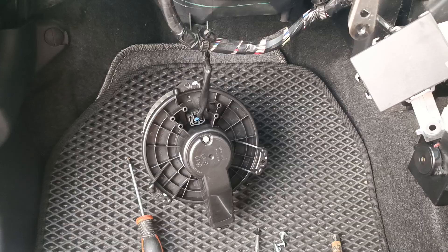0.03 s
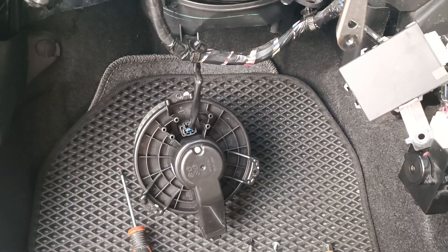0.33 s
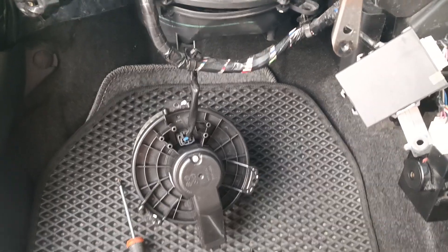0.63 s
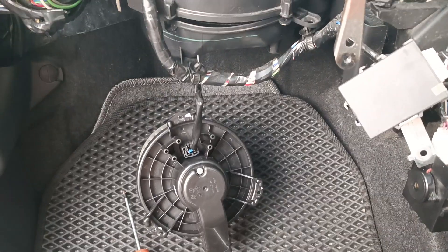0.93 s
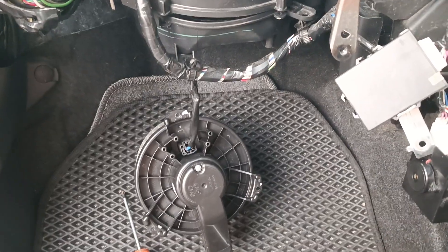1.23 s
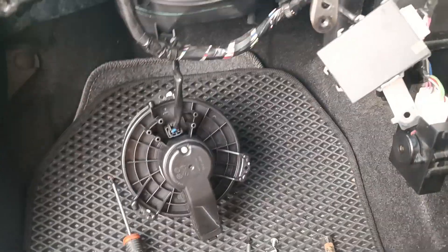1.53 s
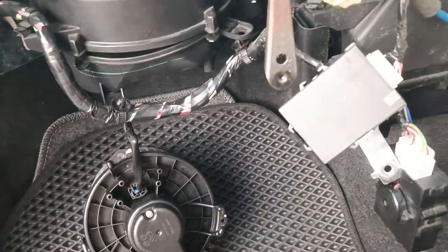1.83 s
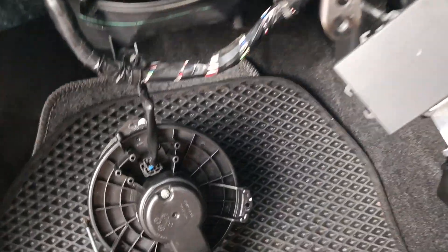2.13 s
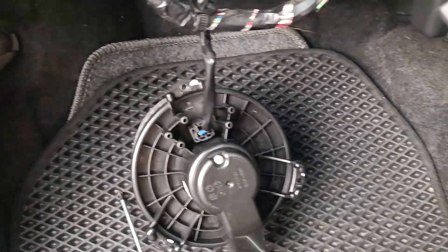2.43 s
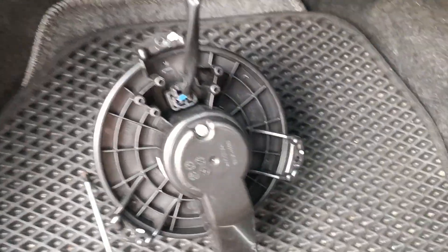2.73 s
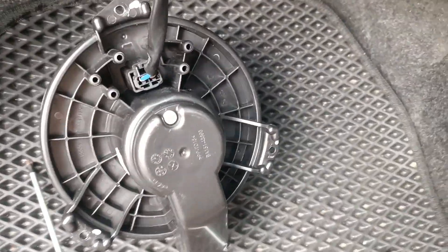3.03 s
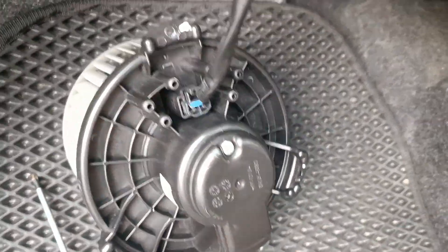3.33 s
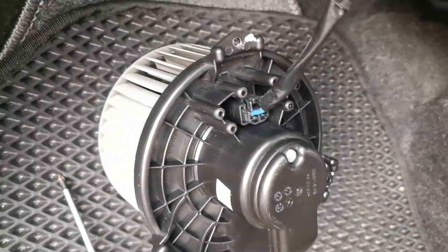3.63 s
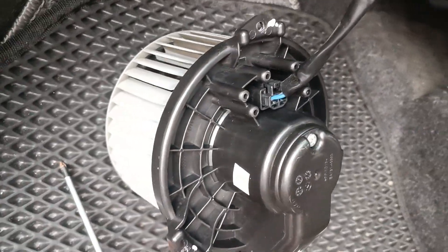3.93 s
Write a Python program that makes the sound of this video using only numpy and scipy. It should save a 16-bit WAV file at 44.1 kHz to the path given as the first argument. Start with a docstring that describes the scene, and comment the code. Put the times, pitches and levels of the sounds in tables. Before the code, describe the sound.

Dull handling knocks and a scrape on a blower motor, followed by a light, sharp clack.

```python
"""Handling noises in a car footwell

A hand-held camera moves over a blower motor lying in a low, steady rumble with a deep drone.
A sleeve brushes softly and a hand scrapes past the left microphone: friction, heard as many tiny slips.
The hand bumps the casing a few times, each damped impact exciting its modes. Then a small hard part
or tool clacks once on the right, ringing briefly at its own higher natural frequencies."""
import sys
import numpy as np
from scipy import signal
from scipy.fft import rfft, irfft
from scipy.io import wavfile
from scipy.ndimage import uniform_filter1d

SR = 44100
rng = np.random.default_rng(int(sys.argv[2]) if len(sys.argv) > 2 else 0)


def output_pcm(signal):
    """Save a mono or channel-first signal as 16-bit PCM at the path in sys.argv[1].

    Samples are clipped to [-1, 1] before scaling.
    """
    pcm = np.clip(np.atleast_2d(signal).T, -1, 1) * 32767
    wavfile.write(sys.argv[1], SR, np.round(pcm).astype(np.int16))


N = 176400
TIME = np.arange(N) / SR

def amp(db):
    """Amplitude ratio of a level in decibels."""
    return 10 ** (np.asarray(db) / 20)

def unit(x):
    """Normalisation to rms 1."""
    return x / np.sqrt(np.mean(x ** 2) + 1e-20)

def at_hz(points, hz):
    """Interpolation of each column on a log-frequency axis."""
    f, *columns = np.transpose(points)
    return np.array([np.interp(np.log(hz + 1), np.log(f + 1), column) for column in columns])

def at_time(points):
    """Linear interpolation over time."""
    return np.interp(TIME, *np.transpose(points))

def panned(side_db):
    """Level difference between channels: positive favours the left, and the louder gain is 1."""
    return amp(np.minimum([[side_db], [-side_db]], 0))

def add(mix, start, sound):
    """Superposition of a stereo sound from a start time in seconds."""
    part = mix[:, round(start * SR):][:, :sound.shape[1]]
    part += sound[:, :part.shape[1]]

def coloured(x, spectrum, tilt_db=0):
    """Spectral shaping to rms 1, with a tilt per octave about 4 kHz."""
    hz = np.fft.rfftfreq(x.shape[-1], 1 / SR)
    octaves = np.log2(np.maximum(hz, 500) / 4000)
    low_cut = hz ** 2 / (hz ** 2 + (spectrum[0][0] / 2) ** 2)
    return unit(irfft(rfft(x) * low_cut * amp(at_hz(spectrum, hz) + tilt_db * octaves), x.shape[-1]))

def drift(rate_hz):
    """Slow random modulation: low-passed noise of rms 1."""
    low_pass = np.exp(-(np.fft.rfftfreq(N, 1 / SR) / rate_hz) ** 2)
    return unit(irfft(rfft(rng.standard_normal(N)) * low_pass, N))

def tone(hz):
    """A sinusoid of rms 1 whose phase is the integral of frequency."""
    return np.sqrt(2) * np.sin(2 * np.pi * np.cumsum(hz) / SR)

def stroke(peak, rise, fall):
    """A Gaussian envelope with separate widths before and after its peak."""
    return np.exp(-.5 * ((TIME - peak) / np.where(TIME < peak, rise, fall)) ** 2)

def friction(per_s, spread_db, hiss):
    """Stick-slip friction: random impulses of uneven size over a smooth hiss, in stereo."""
    slips = (rng.random((2, N)) < per_s / SR) * rng.choice([-1, 1], (2, N))
    sizes = amp(spread_db * np.minimum(rng.exponential(1, (2, N)), 4))
    return unit(unit(slips * sizes) + hiss * rng.standard_normal((2, N)))

def ring(modes, t, scatter):
    """Free vibration: damped modes, with phases scattered by up to `scatter` cycles per channel."""
    return sum(amp(db - 60 * t / t60) * np.sin(2 * np.pi * (hz * t + scatter * rng.random((2, 1))))
               for hz, db, t60 in modes)

# Background spectrum (frequency [Hz], left density [dB/Hz], right density [dB/Hz])
CABIN_SPECTRUM = [(27, -82, -84), (40, -87, -91), (50, -72.5, -73), (76, -67, -68), (108.8, -71.5, -71.5),
                  (125, -77, -78.5), (154.4, -73.5, -75.5), (189.5, -84.5, -84.5), (253, -83.5, -87.5),
                  (290.7, -76, -77), (335, -86, -86), (450, -84, -85), (730, -88, -88.5),
                  (1370, -94.5, -93.5), (2280, -99, -88.5), (3300, -100, -96.5), (4050, -101.5, -104),
                  (5200, -102, -104), (6750, -107, -98), (7930, -113, -118), (8480, -112, -126),
                  (9810, -102, -120), (11600, -115, -114)]
# Likeness of the two channels (frequency [Hz], correlation [1])
CABIN_CORRELATION = [(60, 1), (150, 0.91), (380, 0.72), (950, -0.015), (2380, -0.032), (5980, 0.3),
                     (15000, 0.1)]
# Slow emphasis of the mids (time [s], gain [dB])
MID_GAIN = [(.2, 2), (.5, 3), (.8, 0.5), (1.3, 1), (1.9, 1), (2.2, 0), (3.65, -1), (4, 2.5)]
# Slow emphasis of the upper bass (time [s], gain [dB])
UPPER_BASS_GAIN = [(.3, 4), (1.2, -1), (3.6, 1), (3.85, 5)]
def cabin():
    """Partly correlated rumble and hiss, rippled by the cabin's many fixed resonances."""
    size, hop = 4096, 1024
    hz, t = np.fft.rfftfreq(size, 1 / SR), np.arange(N // hop + 3) * hop / SR
    a, b, c, d, patches = rng.standard_normal((len(t), len(hz), 5)).T
    correlation = at_hz(CABIN_CORRELATION, hz).T
    left = a + 1j * b
    right = correlation * left + np.sqrt(1 - correlation ** 2) * (c + 1j * d)
    ripple = unit(uniform_filter1d(rng.standard_normal((2, len(hz))), size=3, axis=1))
    colour_db = at_hz(CABIN_SPECTRUM, hz) + 1.67 * ripple / (1 + hz / 3000) * (hz > 330)
    patches = uniform_filter1d(patches, size=10, axis=0)
    flicker_db = 1.54 * unit(uniform_filter1d(patches, size=5, axis=1))
    level_db = colour_db[..., None] + flicker_db
    for curve, centre_hz, octaves in [(MID_GAIN, 694, 1.5), (UPPER_BASS_GAIN, 154, .6)]:
        band = np.exp(-(np.log2((hz + 1) / centre_hz) / octaves) ** 2)
        level_db += np.outer(band, np.interp(t, *np.transpose(curve)))
    noise = signal.istft(np.array([left, right]) * amp(level_db), nperseg=size, noverlap=size - hop)[1]
    return noise[:, :N] * np.sqrt(1.5 * SR / size)

# Deep tone (time [s], frequency [Hz], level [dB])
DEEP_TONE = [(.2, 54.7, -49.5), (.57, 47.4, -58), (1, 47.5, -56), (1.23, 54.3, -49.5), (1.89, 54.7, -45),
             (1.99, 48.4, -57.5), (2.21, 47.5, -49), (2.49, 48.1, -52.5), (2.63, 55, -61),
             (2.74, 55.85, -48.5), (4, 56, -50.5)]
# Hum above it (time [s], level [dB])
HUM_LEVEL = [(.3, -67), (.62, -46.5), (.9, -51), (1.6, -55), (2.13, -51), (2.45, -54)]
# Partials of a faint whine (frequency [Hz], level [dB], late swell [dB])
WHINE_PARTIALS = [(667, -78, 8.5), (889, -75.5, 1)]
def drone():
    """Modulated sinusoids: a deep tone that sags twice and recovers, a hum and a thin whine."""
    times, pitch, level = np.transpose(DEEP_TONE)
    deep = amp(np.interp(TIME, times, level)) * tone(np.interp(TIME, times, pitch))
    hum = amp(at_time(HUM_LEVEL)) * tone(hz=71 + 0.86 * drift(rate_hz=5.6))
    swell = stroke(peak=3.364, rise=0.28, fall=0.28)
    whine = sum(amp(db + swell_db * swell + 2 * drift(rate_hz=6.7)) * tone(hz + 2 * drift(rate_hz=9.3))
                for hz, db, swell_db in WHINE_PARTIALS)
    return deep + hum + whine

# Faint hollow swells (peak time [s], centre frequency [Hz], level [dB])
HOLLOW_SWELLS = [(.3, 400, -59.5), (.45, 281, -57), (.67, 232, -55.5), (2.53, 418, -59.5)]
def swells(width_hz=55):
    """Narrow-band noise has a vague, hollow pitch; each band rises and falls away."""
    hz, out = np.fft.rfftfreq(N, 1 / SR), np.zeros(N)
    for peak, centre, db in HOLLOW_SWELLS:
        band = irfft(rfft(rng.standard_normal(N)) / (1 + ((hz - centre) / width_hz) ** 2) ** 2, N)
        out += amp(db) * stroke(peak, rise=0.065, fall=0.065) * unit(band)
    return out

# Short strokes (peak time [s], rise [s], fall [s], level [dB], leftward pan [dB], tilt [dB/octave])
SLEEVE_BRUSHES = [(.435, 0.024, 0.036, -49, -15, 1.5), (.53, 0.04, 0.044, -50, -13, -2),
                  (.65, 0.057, 0.039, -54.5, -14, -3), (.33, 0.044, 0.12, -61, 0, -5),
                  (.845, 0.055, 0.035, -57.5, -10, 0.5), (.903, 0.013, 0.016, -52.5, 9, -1.5),
                  (1.392, 0.002, 0.0033, -52, 3, -1), (2.82, .04, .04, -61, -1, -3.5)]
# Spectrum of brushing cloth (frequency [Hz], relative level [dB])
CLOTH_SPECTRUM = [(400, -17), (1000, -7), (2400, -3), (4000, -1.5), (6300, 2.5), (8200, -15.5),
                  (10500, -16), (13000, -9.5), (15500, -11)]
# Spectrum of the long slide (frequency [Hz], left gain [dB], right gain [dB])
SLIDE_SPECTRUM = [(599.6, -3, -5), (1402, -3, -6), (2440, -6, 8.5), (2980, -4, -0.5), (4300, -4, -7),
                  (5630, 0, -10), (6400, -7, 3.5), (8460, -14, -27), (9050, -3.5, -29), (10600, -1.5, -22),
                  (11500, -11, -21), (15500, -22, -14)]
def sleeve():
    """Sliding friction of cloth radiates broadband noise, in short strokes and one long slide."""
    out = np.zeros((2, N))
    for peak, rise, fall, db, side_db, tilt_db in SLEEVE_BRUSHES:
        rub = coloured(friction(per_s=1400, spread_db=5.5, hiss=1.6), CLOTH_SPECTRUM, tilt_db)
        out += amp(db) * panned(side_db) * stroke(peak, rise, fall) * rub
    slide = coloured(friction(per_s=4800, spread_db=3.0, hiss=1.8), SLIDE_SPECTRUM)
    return out + amp(-55) * stroke(peak=3.18, rise=0.11, fall=0.11) * slide

ATTACK_S = 0.00016
# Dull impacts (time [s], level [dB], frequency [Hz], T60 [s], leftward pan [dB], ring gain [dB])
HAND_BUMPS = [(0.655, -29, 750, 0.0081, -17, -34), (1.509, -26.5, 450, 0.025, 24, -28),
              (1.5213, -32.5, 255, 0.051, 30, -9), (1.5325, -23.5, 512, 0.018, 30, -21),
              (1.5376, -19, 620, 0.009, 38, -11), (1.5465, -23.5, 432, 0.048, 35, -14.5),
              (1.5754, -31.5, 730, 0.0066, 5, -31), (1.589, -27, 560, 0.012, 25, -39),
              (1.6114, -19.5, 1020, 0.0032, 16, -49), (1.6134, -23, 253, 0.0089, 30, -45)]
# Modes of the casing (frequency [Hz], relative level [dB], T60 [s])
CASING_MODES = [(256, 2.5, 0.15), (419, 0, 0.058), (488, 0, 0.064), (615, -3, 0.048), (995, -7, .06),
                (1410, -2, 0.066), (1700, -7.5, 0.086), (2970, -27, .08)]
# Spectrum of a hand's snap or scuff on the casing (frequency [Hz], relative level [dB])
CONTACT_SPECTRUM = [(300, -3), (1300, 3.5), (3000, -4.5), (5800, 0), (7500, -20), (10000, -25),
                    (13000, -33)]
def bumps(cutoff_ratio=1.9, snap_db=-8.5, snap_s=0.00061):
    """Impact excitation: a soft contact gives a damped, low-passed push and a snap, and rings the casing."""
    out, t = np.zeros((2, N)), np.arange(SR // 4) / SR
    onset = 1 - np.exp(-t / ATTACK_S)
    for start, db, hz, t60, side_db, ring_db in HAND_BUMPS:
        phase = np.arctan(np.log(1000) / t60 / (2 * np.pi * hz))  # balances the push about zero
        push = np.cos(2 * np.pi * hz * t + phase) * amp(-60 * t / t60)
        pole = np.exp(-2 * np.pi * cutoff_ratio * hz / SR)
        push = signal.lfilter([(1 - pole) ** 2], [1, -2 * pole, pole ** 2], push)
        noise = coloured(rng.standard_normal((2, len(t))), CONTACT_SPECTRUM, tilt_db=-1)
        snap = amp(snap_db) * np.exp(-t / snap_s) * noise
        casing = amp(ring_db) * ring(CASING_MODES, t, scatter=0.14)
        add(out, start, amp(db) * panned(side_db) * (push / abs(push).max() + onset * (snap + casing)))
    return out

# A faint touch, then the three contacts of one clack (time [s], level [dB], leftward pan [dB])
PART_CONTACTS = [(1.4672, -51.5, 2), (1.9630, -33.5, -4), (1.9643, -34.5, -15), (1.9686, -35.5, -3.5)]
# Modes of the hard part (frequency [Hz], relative level [dB], T60 [s])
PART_MODES = [(2154, -5, .14), (2430, -2, 0.082), (3050, -5, .1), (3130, 3.5, 0.082), (3470, 2, 0.043),
              (4020, -10, .07), (5100, 7.5, 0.032), (6586, 8.5, 0.029), (7214, -6, 0.056)]
# Spectrum of the clatter (frequency [Hz], left gain [dB], right gain [dB])
CLATTER_SPECTRUM = [(1200, -28, -25), (2060, -4, 3.5), (3340, 2, 6), (4400, 0, -2), (6660, -1, 3),
                    (8400, -3, -29), (10100, -3, -22), (11200, -10, -27), (12500, -12, -13)]
def clack(clatter_t60=0.02, footwell_t60=0.14, footwell_db=-12.5, ring_db=-12):
    """Brief, hard contacts excite a small part's high modes; the footwell adds short reverberation."""
    out, t = np.zeros((2, N)), np.arange(SR // 4) / SR
    onset = 1 - np.exp(-t / ATTACK_S)
    decay = amp(-60 * t / clatter_t60) + amp(footwell_db - 60 * t / footwell_t60)
    for start, db, side_db in PART_CONTACTS:
        clatter = decay * coloured(rng.standard_normal((2, len(t))), CLATTER_SPECTRUM)
        ringing = amp(ring_db) * onset * ring(PART_MODES, t, scatter=1)
        add(out, start, amp(db) * panned(side_db) * (clatter + ringing))
    return out

# Envelope of the hand's scrape (time [s], level [dB])
SCRAPE_LEVEL = [(1.478, -62), (1.490, -43), (1.499, -33.5), (1.510, -29), (1.517, -37), (1.525, -31),
                (1.533, -27.5), (1.543, -34), (1.56, -41.5), (1.577, -47), (1.60, -57), (1.65, -63)]
# Spectrum of the scrape (frequency [Hz], relative level [dB])
SCRAPE_SPECTRUM = [(150, 0.5), (400, 6), (800, -4), (1200, -4), (1700, -1), (3500, -0.5), (5300, -0.5),
                   (7000, -4.5), (8300, -10), (10000, -5), (12000, -17), (15500, -22)]
# Duller scuffs around the last bump (peak time [s], rise [s], fall [s], level [dB])
HAND_SCUFFS = [(1.6086, 0.0012, .002, -33.5), (1.618, 0.0044, 0.011, -44)]
def scrape():
    """Friction of a hand on the casing, so near the left microphone that the right barely hears it."""
    level = amp(at_time(SCRAPE_LEVEL)) * (TIME > SCRAPE_LEVEL[0][0]) * (TIME < SCRAPE_LEVEL[-1][0])
    rub = friction(per_s=4500, spread_db=-1, hiss=0.97)
    scuffs = sum(amp(db) * stroke(peak, rise, fall) for peak, rise, fall, db in HAND_SCUFFS)
    drag = level * coloured(rub, SCRAPE_SPECTRUM)
    return panned(side_db=38) * (drag + scuffs * coloured(rub, CONTACT_SPECTRUM))

def scene():
    """Linear superposition of all sources at the two microphones."""
    return cabin() + drone() + swells() + sleeve() + bumps() + clack() + scrape()

# Quick fade-in, whose last gain holds to the end (time [s], gain [dB])
FADE_GAIN = [(.075, -60), (.09, -22.5), (.14, -12.5), (.2, -5.5), (.25, -1)]
def record(dry, cutoff_hz=15850):
    """A gain envelope fades the sound in, and a low-pass filter limits its bandwidth."""
    low_pass = signal.firwin(511, cutoff_hz, window=("kaiser", 9), fs=SR)
    return signal.oaconvolve(dry * amp(at_time(FADE_GAIN)), low_pass[None], "same")

dry = scene()
out = record(dry)
output_pcm(out)
```